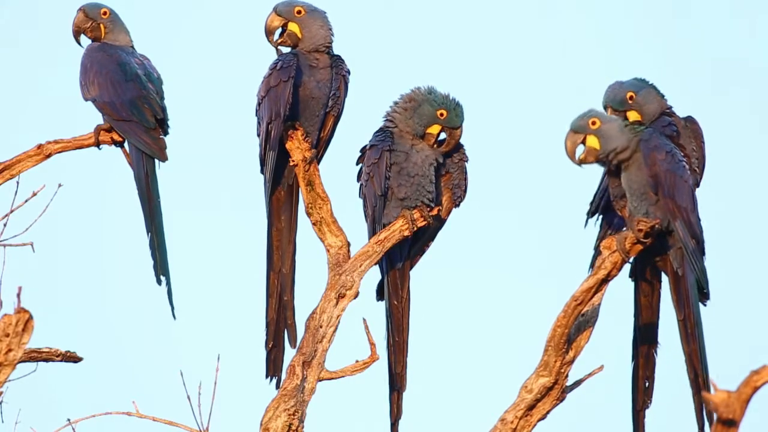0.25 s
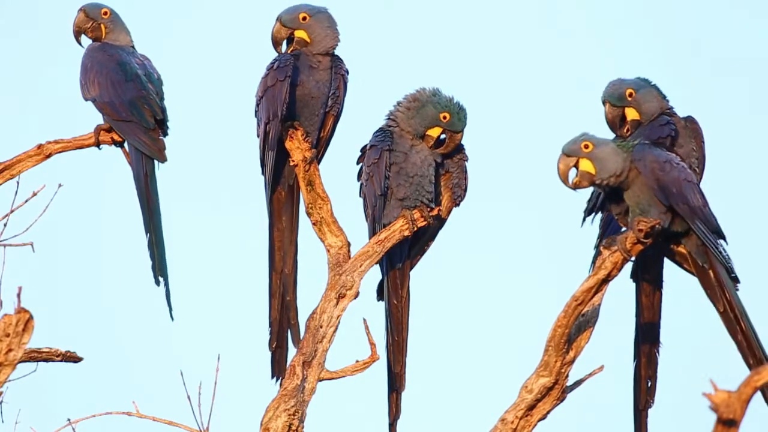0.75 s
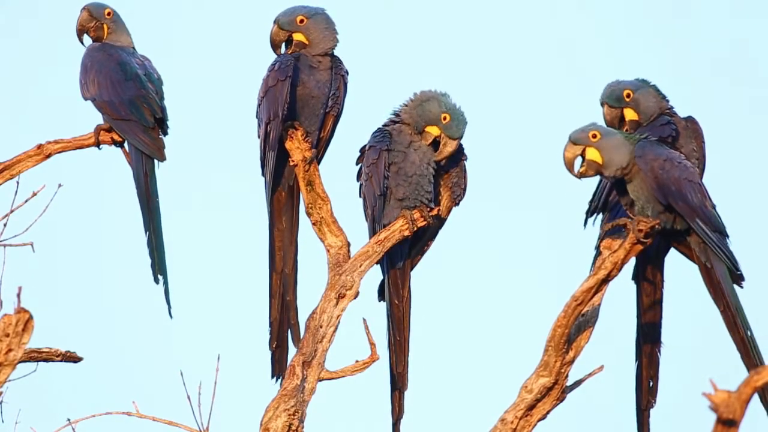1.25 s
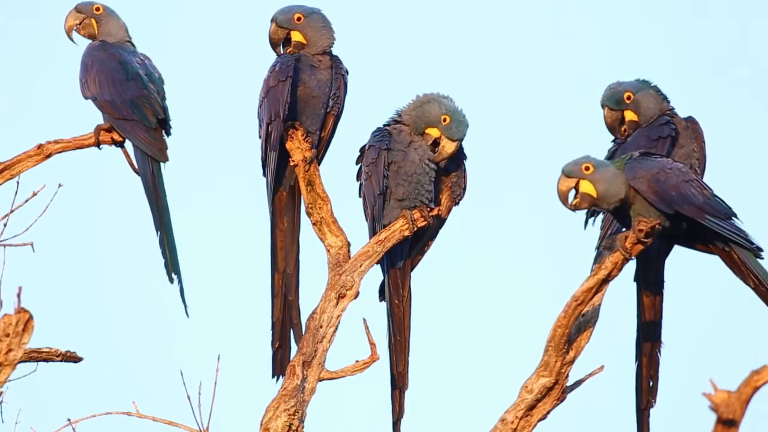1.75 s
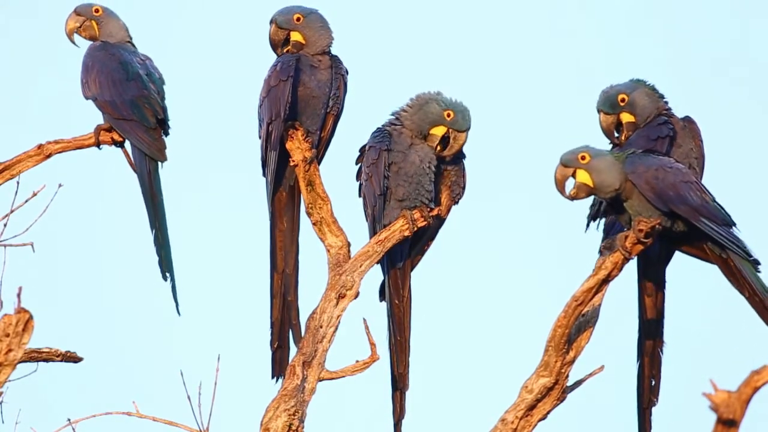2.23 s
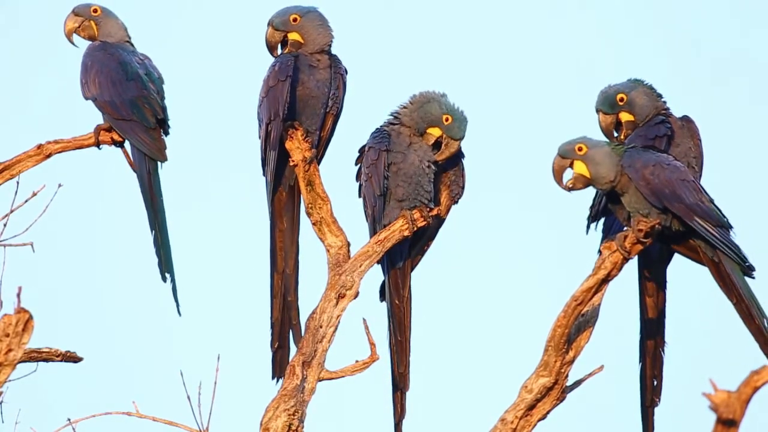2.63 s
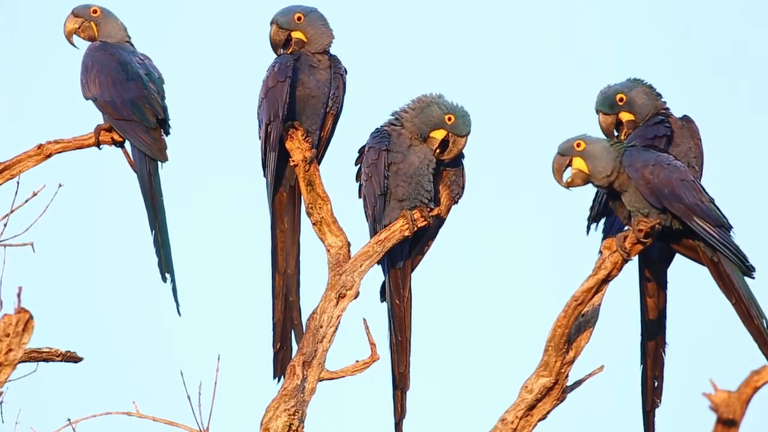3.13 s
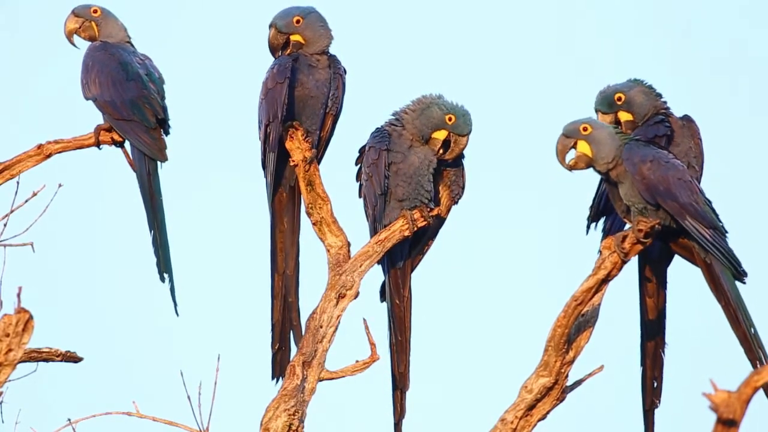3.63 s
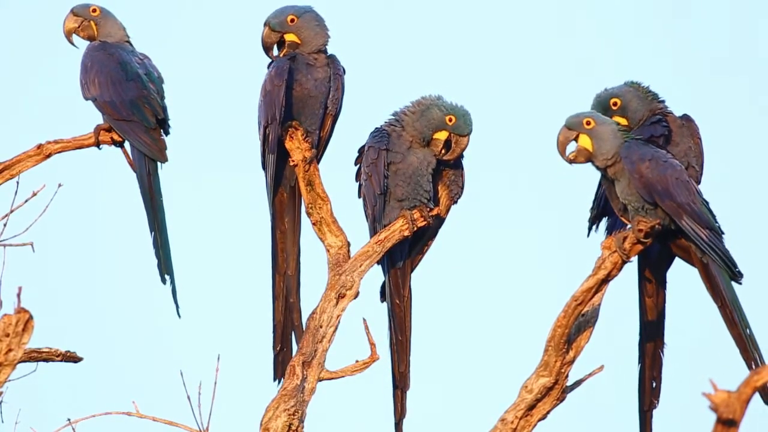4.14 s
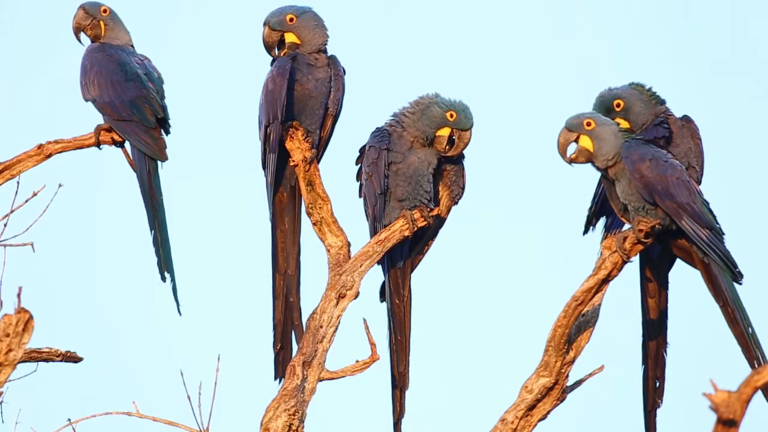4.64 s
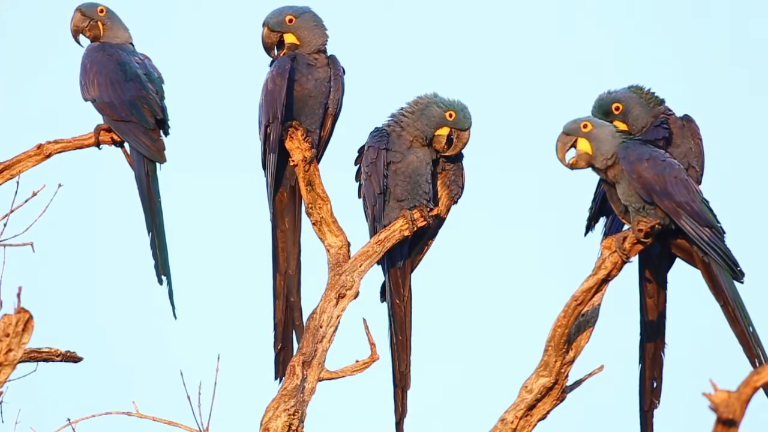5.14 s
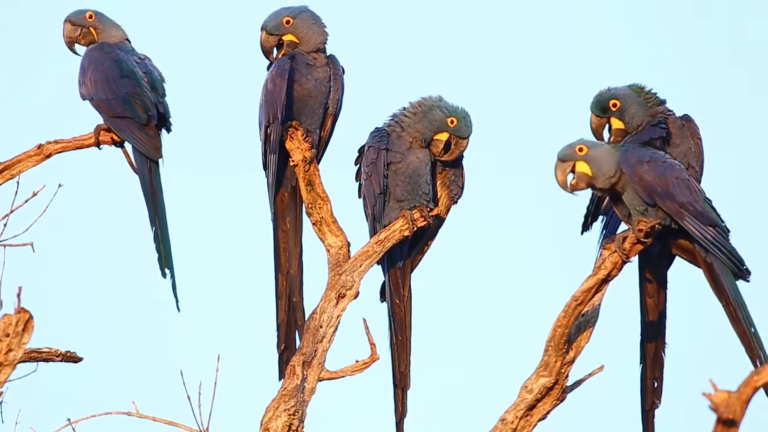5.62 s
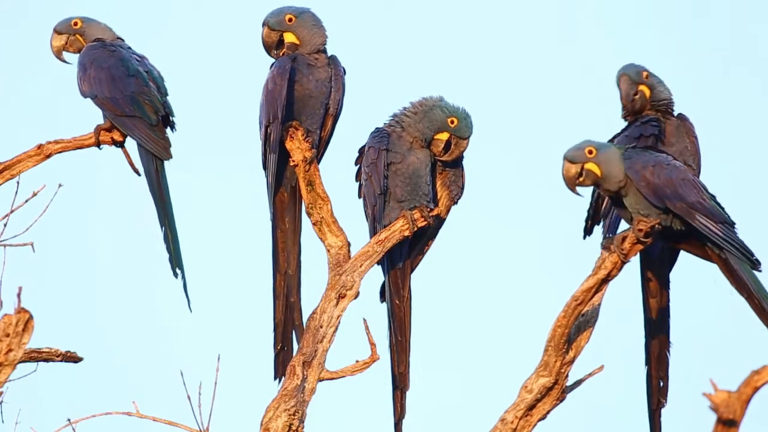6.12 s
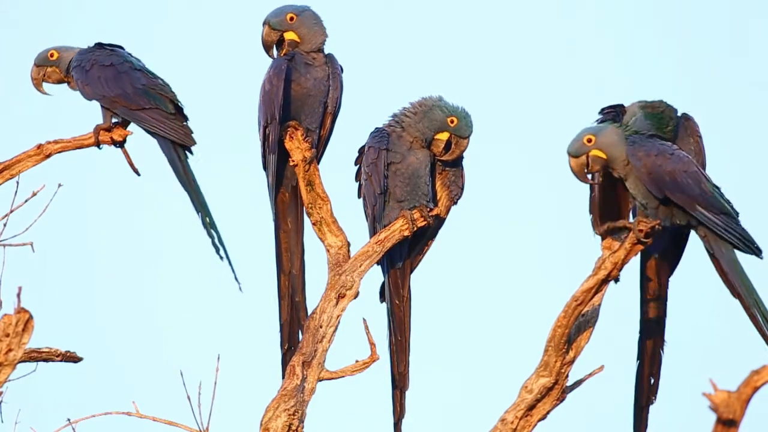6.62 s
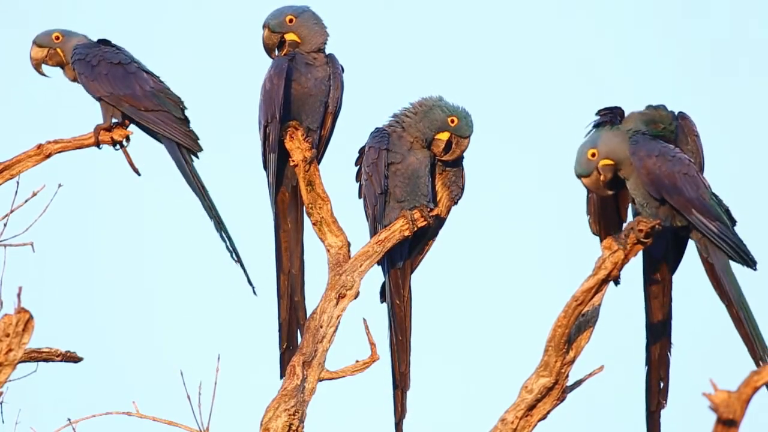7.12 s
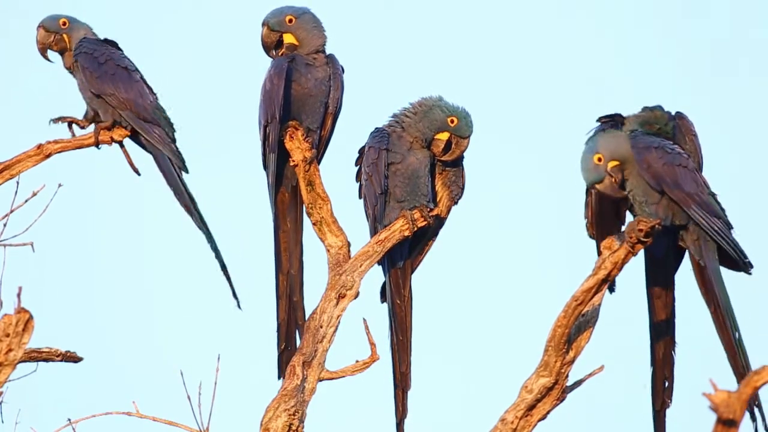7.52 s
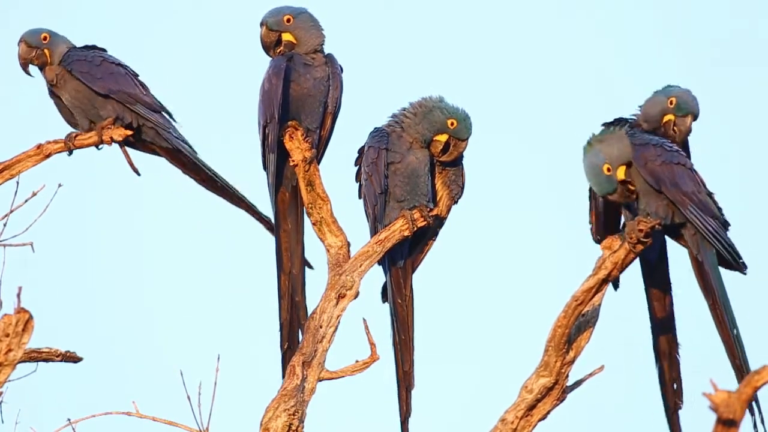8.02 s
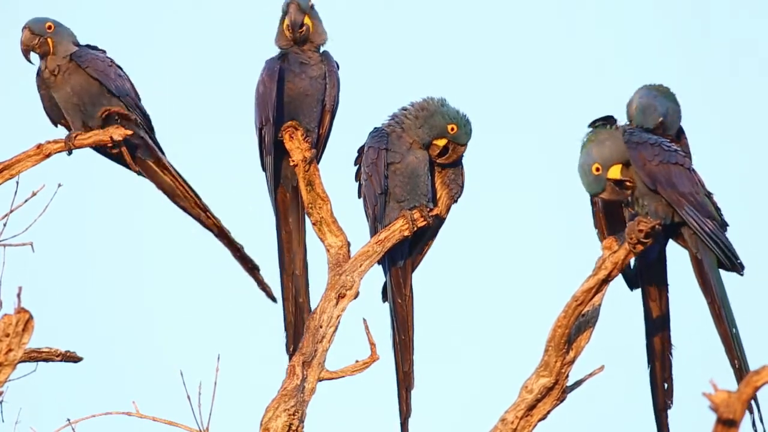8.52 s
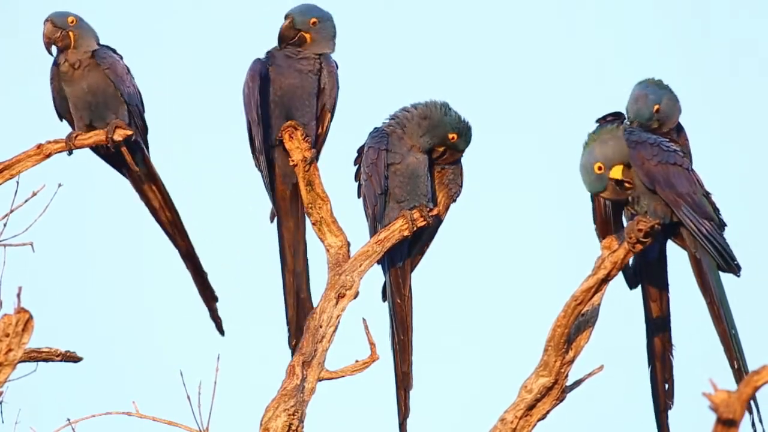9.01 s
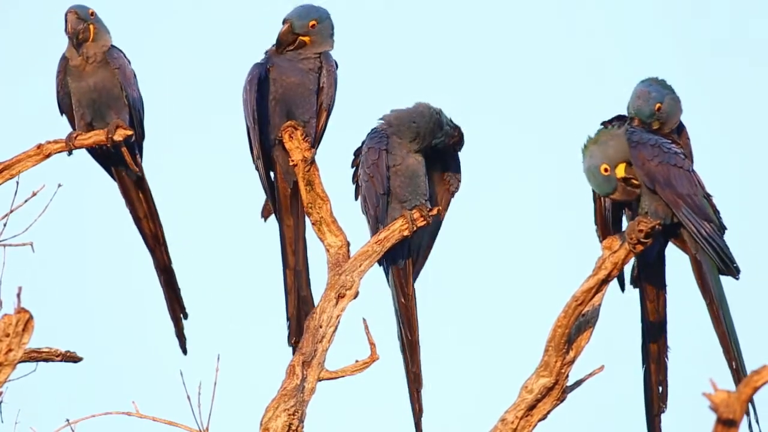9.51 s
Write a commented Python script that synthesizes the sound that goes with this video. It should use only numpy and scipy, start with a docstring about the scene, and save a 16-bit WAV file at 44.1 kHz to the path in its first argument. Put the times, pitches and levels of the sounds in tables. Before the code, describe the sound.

A small flock of large parrots calls outdoors with throaty grunts, sharp falling yelps, wails and one loud rattling squawk, over faint insects and chirping small birds.

```python
"""Macaws call from a dead tree in open woodland: arched cries, clean or rasping, throaty grunts, soft mutters,
runs of squeaks and one loud rattling squawk. Cries are harmonics swept through a tuned throat resonance;
grunts and squawks are uneven pulses ringing a set of resonances; squeaks and small birds are gliding tones.
Small birds chip and trill further off, insects shrill as throbbing tones, and flock and air are shaped noise.
Decaying noise echoes throw the calls back from the trees, onto one microphone channel."""
import sys
import numpy as np
from scipy import signal
from scipy.fft import rfft, irfft
from scipy.io import wavfile

SR = 44100
rng = np.random.default_rng(int(sys.argv[2]) if len(sys.argv) > 2 else 0)


def pcm_store(signal):
    """Save signal as 16-bit PCM."""
    levels = np.round(np.clip(np.atleast_2d(signal), -1, 1) * 32767)
    wavfile.write(sys.argv[1], SR, levels.astype(np.int16).T)


N = 430416
TIME = np.arange(N) / SR   # s

# Levels are relative: layer trims and woodland echoes come on top.
# Still air and far insects: f/Hz, relative density/dB
AIR_SPECTRUM = [(20, -5.5), (55, 1.5), (110, -6.5), (220, -9), (500, 1), (900, -2.5), (1800, -4.5),
                (3800, -13.5), (4500, -1), (5400, -7), (5900, 0.5), (6400, -20), (10000, -18.5),
                (15500, -21)]
AIR_DB = -54
# The rest of the flock, blurred by distance: t/s, level/dB
FLOCK_LEVEL = [(0, -42.5), (.16, -54.5), (.38, -46.5), (1.0, -51.5), (1.2, -53), (2.5, -62), (2.9, -54.5),
               (4.2, -47), (5.2, -62.5), (7.4, -58), (7.8, -50.5), (9.76, -48)]
# Colour of the distant flock: f/Hz, relative level/dB
FLOCK_SPECTRUM = [(250, -40), (500, -60), (900, -7), (1600, -3), (2400, 0.5), (3300, 1.5), (3900, -5),
                  (4600, -15), (7000, -15.5), (12000, -47)]

# Clearest low mutters: t/s, level/dB, f/Hz
MUTTER_NOTES = [(0.623, -43.5, 537), (1.336, -48.5, 483), (1.422, -46.5, 471), (2.353, -48.5, 472),
                (2.696, -51, 639), (5.603, -53.5, 463), (3.102, -44.5, 515.6), (4.222, -46.5, 533),
                (9.043, -50, 494)]
# Clearest chips of the small birds: t/s, level/dB, f/Hz
CHIP_NOTES = [(0.135, -49.5, 6150), (0.434, -48.5, 6880), (0.802, -47.5, 7050), (1.411, -48.5, 7350),
              (3.343, -47, 6630), (4.352, -47, 7250), (6.9, -51, 7350), (7.135, -46.5, 6140),
              (9.39, -48.5, 7500)]
# Spells of fainter chipping: start t/s, end t/s
FAINT_CHIP_SPELLS = [(.3, 1.2), (7.3, 7.65)]

# Grunts: t/s, level/dB, beak opening as treble tilt/dB per octave
GRUNT_NOTES = [(0.177, -28, 1), (1.335, -28.5, 16), (1.42, -33.5, 14), (1.683, -27.5, 3.5),
               (2.361, -29.5, 12), (2.461, -23, 3.5), (2.984, -25, 4), (3.105, -32.5, 3.5),
               (3.325, -34.5, 5), (3.477, -21, 8), (4.046, -22, 5.5), (4.478, -25, 3), (5.043, -24.5, 2),
               (5.426, -26, 2.5), (5.75, -32.5, 5), (5.777, -23.5, 5), (6.314, -24.5, 1.5),
               (7.085, -25.5, 3), (7.523, -25, 2), (8.413, -26.5, 4), (9.138, -27, 1.5), (9.395, -32, 4)]
# Throat with the beak nearly shut, before that tilt: f/Hz, width/Hz, level/dB
GRUNT_RESONANCES = [(358, 180, -20), (600, 560, -10), (1100, 310, -4), (1560, 190, -2.5), (2037, 163, 2.5),
                    (2530, 960, -6.5), (2920, 1600, -14)]
GRUNT_S = 0.042
THROAT_SPREAD = 0.033   # share by which the throat's resonances shift from note to note

# Colour of the cries apart from the tuned throat resonance: f/Hz, level/dB
CRY_COLOUR = [(700, 10), (1100, 4), (1600, 6.5), (2400, 5), (3700, 8.5), (4700, -1), (5500, -3.5),
              (6600, -3.5), (8100, -7.5), (10000, -8.5), (14000, -44)]
# Yelps leap to their top and slide down: top t/s, fall t/s, top f/Hz, level/dB, overtone lift/dB
YELP_CALLS = [(0.236, 0.085, 1823, -29, -11), (.584, 0.065, 1740, -31, -12), (1.268, .045, 1625, -36, 0),
              (2.195, 0.081, 1704, -33, 1), (2.267, 0.07, 1972, -24, 2.5), (3.179, 0.066, 1798, -44, 0),
              (3.447, 0.088, 1897, -31, -9), (4.152, .05, 1718, -31.5, -15), (4.546, 0.076, 1823, -34, 4),
              (7.58, .135, 1653, -42.5, -21), (8.055, .085, 1862, -29.5, -14), (8.58, 0.093, 2040, -44, -1),
              (8.928, 0.04, 1750, -34, -1), (9.177, 0.055, 1710, -33.5, -4), (9.51, 0.063, 1660, -37, -6)]
# Rasps, high forced cries: start t/s, length t/s, top f/Hz, end pitch/share of top, level/dB,
# roughness/factor, overtone lift/dB
RASP_CALLS = [(.35, 0.073, 2177, 0.7, -41, 0.88, -3), (.888, 0.19, 1433, 0.82, -45, 0.7, -21),
              (1.749, .1, 1610, 0.68, -38, 0.4, -1), (1.913, 0.14, 1908, .74, -34, 0.6, 4),
              (1.926, .135, 2573, .7, -38, 0.44, 4), (3.074, .16, 1805, .97, -33, .42, -4),
              (3.828, 0.14, 1887, 0.96, -41.5, 1.11, -1), (4.166, 0.11, 1982, 0.87, -40.5, 1.1, -3),
              (7.673, 0.16, 1841, 0.83, -33, 0.41, -3), (7.87, 0.17, 2070, 0.77, -50, .5, 0),
              (8.146, .19, 2326, 0.74, -44.5, 0.82, -13), (8.6, .125, 1850, .88, -36, 0.66, -7),
              (8.682, 0.13, 2006, 0.9, -41, 0.92, -5), (9.532, 0.11, 1950, 0.67, -48.5, 0.6, 17)]
# Wails, long arches on the second harmonic: start t/s, length t/s, top f/Hz, end pitch/share of top,
# level/dB, overtone lift/dB
WAIL_CALLS = [(.417, .2, 1375, 0.82, -34, -19), (.888, 0.2, 1310, 0.9, -50, -5),
              (1.75, 0.084, 1612, 0.48, -38, -14), (1.79, 0.13, 1267, 0.97, -36, -22),
              (2.33, 0.24, 1280, 0.88, -41, -8), (2.39, 0.28, 1651, 0.72, -33, 1),
              (3.63, .35, 1537, 0.64, -34.5, -18), (4.075, 0.22, 991, 0.76, -43.5, -4),
              (4.677, .283, 1440, .8, -42, -4), (6.232, 0.3, 1173, 0.65, -42, -14.5),
              (8.229, 0.27, 1393, 0.69, -35.5, -21), (8.475, .3, 1071, .85, -51.5, -13.5),
              (9.085, 0.28, 1442, 0.9, -43.5, 1), (9.675, 0.25, 1578, .88, -39, -13)]
# Whines, even arches on the third harmonic: start t/s, length t/s, top f/Hz, end pitch/share of top,
# level/dB, overtone lift/dB
WHINE_CALLS = [(.743, .257, 1058, .85, -43.5, -11), (1.53, .18, 1233, .67, -40.5, -3),
               (6.055, .155, 1226, .66, -41, -3), (4.302, .33, 1156, .9, -43.5, -26),
               (9.33, .34, 1160, .83, -43.5, -13)]
OVERTONE_PATCHY_DB = 3

# The lower insect buzzes at a steady pace
BUZZ_FIRST_S, BUZZ_EVERY_S, BUZZ_S = 0.23, 1.47, 0.58
# Long bouts of the higher insect: start t/s, length t/s
SHRILL_BOUTS = [(1.3, 1.94), (4.25, 1.45), (6.7, 0.33), (8.8, 1)]

# A tiny bird's trill climbs to a held pitch and drops away again
TRILL_START_S, TRILL_END_S, TRILL_RAMP_S = 0.745, 1.57, 0.083
TRILL_HZ, TRILL_CLIMB, TRILL_DB = 10680, 0.14, -59   # climb is a share of the pitch

# A distant bird's rattle: t/s, level/dB
RATTLE_LEVEL = [(1.68, -50.5), (1.95, -43.5), (2.26, -49.5)]
# Throat of the rattling bird: f/Hz, width/Hz, level/dB
RATTLE_RESONANCES = [(385, 79, -9.5), (636, 97, -7.5), (1100, 374, -7.5), (1595, 71, 4.5), (2200, 840, -9)]
# Beak and claw ticks: t/s, level before the decay/dB
TICK_TIMES = [(2.897, -52), (3.123, -43.5), (3.335, -43), (5.976, -48), (7.304, -49.5), (7.917, -43),
              (9.641, -44), (9.694, -46.5)]
# Runs of short falling squeaks: start t/s, length t/s, level/dB, f/Hz
SQUEAK_SERIES = [(4.237, .02, -46, 887), (7.793, .1, -44.5, 1016), (9.003, .1, -42.5, 1246),
                 (9.3, .1, -42, 1100)]
SQUEAK_GAP_S = 0.037   # from one start to the next

# Throat of the squawking bird: f/Hz, width/Hz, level/dB
SQUAWK_RESONANCES = [(610, 140, -4.5), (1000, 170, 1), (1310, 146, 9), (1756, 250, 12), (2370, 110, -17),
                     (2670, 260, -18), (3310, 400, 3), (3646, 305, 4.5), (4680, 370, -14),
                     (6700, 1640, -54), (9900, 540, -18)]
# The squawk swells syllable by syllable until the last one gives out
SQUAWK_START_S, SYLLABLE_S, SQUAWK_DB = 6.585, 0.0445, -29.5
QUICKEN_S = 0.0008   # times the syllable number squared: the beats draw closer together
SWELL_DB_PER_SYLLABLE, LAST_SYLLABLE_DROP_DB = 0.8, 7
SYLLABLE_SHARE = 0.89   # the voice sounds for this share of SYLLABLE_S

CUTOFF_HZ = 15750


def from_db(db):
    """Decibels to gain."""
    return 10 ** (np.asarray(db) / 20)


def rms_one(x):
    """Scale to unit rms."""
    return x / np.sqrt(np.mean(x ** 2) + 1e-20)


def level_curve(rows):
    """Levels joined by straight lines, at every sample."""
    seconds, level_db = np.transpose(rows)
    return np.interp(TIME, seconds, level_db)


def gain_at(spectrum, hz):
    """Gain of a spectrum, read on a log-frequency axis."""
    points, db = np.transpose(spectrum)
    return from_db(np.interp(np.log(hz + 1), np.log(points), db))


def add(out, s, sound):
    """Mix a sound in at time s."""
    i = max(0, int(s * SR))
    out[i:i + len(sound)] += sound[:max(0, N - i)]


def band(x, low_hz, high_hz):
    """Second-order band-pass."""
    edges = [low_hz, min(high_hz, SR / 2 - 1)]
    return signal.sosfilt(signal.butter(2, edges, "band", fs=SR, output="sos"), x)


def wander(size, per_s):
    """Random values, so many a second, joined by lines."""
    steps = np.arange(size) * per_s / SR
    knots = rng.standard_normal(int(steps[-1]) + 2)
    return np.interp(steps, np.arange(len(knots)), knots)


def swell(size, attack, release):
    """Smooth envelope; attack and release are shares of its length."""
    u = np.linspace(0, 1, size)
    ramp = np.clip(np.minimum(u / attack, (1 - u) / release), 0, 1)
    return np.sin(np.pi / 2 * ramp) ** 2


def phase_of(hz):
    """Running phase of a moving pitch."""
    return 2 * np.pi * np.cumsum(hz) / SR


def coloured_noise(spectrum):
    """Steady noise of a given spectrum; rms 1."""
    hz = np.arange(N // 2 + 1) * SR / N
    return rms_one(irfft(rfft(rng.standard_normal(N)) * gain_at(spectrum, hz), N))


def air():
    """Still air and far insects blend into steady shaped noise."""
    return from_db(AIR_DB) * coloured_noise(AIR_SPECTRUM)


def far_flock():
    """Distant voices blur into shaped noise that rises, falls and wavers."""
    level_db = level_curve(FLOCK_LEVEL) + 2 * wander(N, 13)
    return from_db(level_db) * coloured_noise(FLOCK_SPECTRUM)


def woodland(x, near_db, near_t60, far_db, far_t60, far_low_hz, far_high_hz):
    """Scatter from nearby branches, then a longer, narrower wash from the tree line."""
    t = TIME[:2 * SR]
    near = band(rng.standard_normal(len(t)), 350, 7800)
    near = near * from_db(-60 * t / near_t60) * (t > 0.003)
    far = band(rng.standard_normal(len(t)), far_low_hz, far_high_hz)
    far = far * from_db(-60 * t / far_t60) * (1 - np.exp(-t / 0.044))   # builds up gradually
    near_echo = from_db(near_db) * near / np.sqrt(np.sum(near ** 2))
    far_echo = from_db(far_db) * far / np.sqrt(np.sum(far ** 2))
    return x + signal.fftconvolve(x, near_echo + far_echo)[:N]


def small_notes(rows, length_s, glide, arch, jitter, overtone_db, count):
    """Brief gliding, arched notes with a few weakening harmonics."""
    out, u = np.zeros(N), np.linspace(-1, 1, int(length_s * SR))
    for s, level_db, hz in rows:
        phase = phase_of(hz * (1 + glide * u - arch * u * u + jitter * wander(len(u), 509)))
        note = sum(from_db(overtone_db * k) * np.sin((k + 1) * phase) for k in range(count))
        add(out, s, from_db(level_db) * note * swell(len(u), attack=0.18, release=0.18))
    return out


def stray_notes(start, end, count, level_db, hz, spread):
    """Faint notes at loose intervals, scattered around one pitch: t/s, level/dB, f/Hz."""
    notes = []
    for k, (when, high) in enumerate(rng.random((count, 2))):
        s = start + (end - start) * (k + when) / count
        notes.append((s, level_db, hz * (1 + spread * (2 * high - 1))))
    return notes


def mutters():
    """Low, soft voices: short notes that wobble roughly, with nearly equal harmonics."""
    notes = MUTTER_NOTES + stray_notes(0, N / SR, count=9, level_db=-50, hz=544, spread=0.178)
    return from_db(-0.5) * small_notes(notes, length_s=0.038, glide=0.048, arch=0.057, jitter=0.1,
                                       overtone_db=-1, count=4)


def chips():
    """Small birds' very short, high and nearly pure notes."""
    notes = list(CHIP_NOTES)
    for start, end in FAINT_CHIP_SPELLS:
        notes += stray_notes(start, end, count=5, level_db=-51, hz=7050, spread=0.065)
    return from_db(1.0) * small_notes(notes, length_s=0.019, glide=0.0065, arch=0.025, jitter=0.016,
                                      overtone_db=-19, count=2)


def syrinx_pulses(size, pulse_hz, jitter, hiss):
    """The syrinx slaps shut unevenly, with some air noise added."""
    cycles = np.cumsum(pulse_hz * np.exp(jitter * wander(size, pulse_hz))) / SR
    closures = np.diff(np.floor(cycles), prepend=-1)
    slaps = closures * from_db(2.6 * rng.standard_normal(size))
    return rms_one(slaps) + hiss * rng.standard_normal(size)


def resonate(x, modes):
    """Parallel resonances with alternating signs; rms 1."""
    out = 0
    for k, (hz, width, db) in enumerate(modes):
        r = np.exp(-np.pi * width / SR)
        poles = [1, -2 * r * np.cos(2 * np.pi * hz / SR), r * r]
        ringing = (1 - r * r) / 2 * signal.lfilter([1, 0, -1], poles, x)
        out = out + (-1) ** k * from_db(db) * ringing
    return rms_one(out)


def harsh_notes(rows, length_s, modes, pulse_hz, jitter, hiss, attack, release, low_hz, high_hz):
    """Bursts of uneven pulses through the throat; an open beak favours the upper resonances."""
    out, size = np.zeros(N), int(length_s * SR)
    for s, level_db, open_db in rows:
        stretch = 1 + THROAT_SPREAD * rng.standard_normal()
        throat = [(hz * stretch, width, db + open_db * np.log2(hz / 1700)) for hz, width, db in modes]
        voice = resonate(syrinx_pulses(size, pulse_hz, jitter, hiss), throat)
        note = band(voice, low_hz, high_hz) * swell(size, attack, release)
        add(out, s, from_db(level_db) * rms_one(note))
    return out


def grunts():
    """Short bursts of throat pulses, the beak open by a different amount each time."""
    return from_db(-11.5) * harsh_notes(GRUNT_NOTES, GRUNT_S, GRUNT_RESONANCES, pulse_hz=516.0, jitter=0.2,
                                        hiss=0.25, attack=0.33, release=0.45, low_hz=340, high_hz=3010)


def arch(rise_s, fall_s, start_share, end_share, bend):
    """Time from the top of a cry, and its pitch as a share of the top pitch."""
    t = np.arange(-rise_s, fall_s, 1 / SR)
    rising = 1 - (1 - start_share) * (t / rise_s) ** 2
    falling = 1 - (1 - end_share) * np.abs(t / fall_s) ** bend
    return t, np.where(t < 0, rising, falling)


def cry(shape, top_hz, level_db, rough, lift_db, tuning, build, fade_db=0, let_go=1.4):
    """The throat is tuned to a multiple of the top pitch; whichever harmonic crosses it carries the call."""
    t, share = shape
    size = len(t)
    # a forced voice turns chaotic: the pitch scatters and the flow breaks into pulses
    scatter = 0.07385 * rough * wander(size, 900) + 0.0038 * wander(size, 93.7)
    phase = phase_of(top_hz * share * (1 + scatter))
    beating = 7.5 * np.sin(phase_of(172 * np.exp(0.11 * wander(size, 84))))
    flutter = from_db(rough * (beating + 3.2 * wander(size, 598.9)))
    # the throat resonance partly follows the pitch
    centre = tuning * top_hz * share ** 0.77
    voice = 0
    for k in range(1, 9):
        hz = k * top_hz * share
        resonance = 1 + from_db(15) / (1 + (np.log(hz / centre) / 0.15) ** 2)
        # overtones may fade as the pitch sinks, and each comes and goes by itself
        overtone_db = lift_db - fade_db * (1 - share) + OVERTONE_PATCHY_DB * wander(size, 20.4)
        lift = from_db(overtone_db * np.clip(np.log2(hz / centre) * 2, 0, 1))
        strength = gain_at(CRY_COLOUR, hz) * resonance * lift
        voice = voice + strength * np.sin(k * phase) * from_db(2 * wander(size, 66.8))
    # pressure raises loudness together with pitch; it builds late and lets go slowly
    effort = share ** np.where(t < 0, build, let_go) * swell(size, attack=0.056, release=0.084)
    return from_db(level_db) * rms_one(voice * flutter * effort)


def yelps(rise_s=0.025, hold_per_db=0.07, ordinary_db=-33):
    """A quick leap up, then a slide through most of an octave."""
    out = np.zeros(N)
    for top_s, fall_s, hz, level_db, lift_db in YELP_CALLS:
        # above the ordinary level, the louder the yelp, the longer it holds its top
        bend = 0.84 + hold_per_db * max(0, level_db - ordinary_db)
        shape = arch(rise_s, fall_s, start_share=0.66, end_share=0.57, bend=bend)
        call = cry(shape, hz, level_db, rough=0.1, lift_db=lift_db, tuning=1.913, build=4.5,
                   fade_db=37, let_go=2.46)
        add(out, top_s - rise_s, call)
    return out


def rasps(rise_share=0.49):
    """Shallow arches, forced until the voice breaks up."""
    out = np.zeros(N)
    for s, length, hz, end_share, level_db, rough, lift_db in RASP_CALLS:
        rise_s, fall_s = rise_share * length, (1 - rise_share) * length
        shape = arch(rise_s, fall_s, start_share=0.85, end_share=end_share, bend=2.6)
        add(out, s, cry(shape, hz, level_db, rough, lift_db, tuning=1.86, build=4.7))
    return out


def long_cries(rows, rise_share, start_share, bend, rough, tuning):
    """Slow, nearly clean arches."""
    out = np.zeros(N)
    for s, length, hz, end_share, level_db, lift_db in rows:
        rise_s, fall_s = rise_share * length, (1 - rise_share) * length
        shape = arch(rise_s, fall_s, start_share, end_share, bend)
        add(out, s, cry(shape, hz, level_db, rough, lift_db, tuning, build=2.9))
    return out


def wails():
    """Long cries with the throat tuned a little above the second harmonic."""
    return long_cries(WAIL_CALLS, rise_share=0.34, start_share=0.78, bend=2.3, rough=0.031, tuning=2.254)


def whines():
    """Even arches with the throat tuned a little below the third harmonic."""
    return long_cries(WHINE_CALLS, rise_share=0.49, start_share=0.73, bend=1.7, rough=0.026, tuning=2.73)


def insect(bouts, level_db, hz, strokes_hz, depth_db, spread):
    """A shrill wing tone that throbs with each stroke and swells in and out with each bout."""
    singing = np.zeros(N)
    for s, length in bouts:
        add(singing, s, swell(int(length * SR), attack=0.071, release=0.1))
    strokes = from_db(depth_db * np.sin(phase_of(strokes_hz * (1 + 0.022 * wander(N, 5)))))
    tone = np.sin(phase_of(hz * (1 + spread * wander(N, 400))))
    return from_db(level_db) * singing * rms_one(strokes * tone)


def insects():
    """A lower insect in evenly paced buzzes, a higher one in long bouts, each a throbbing wing tone."""
    buzz_bouts = [(s, BUZZ_S) for s in np.arange(BUZZ_FIRST_S, N / SR, BUZZ_EVERY_S)]
    buzz = insect(buzz_bouts, level_db=-58.5, hz=4560, strokes_hz=29.4, depth_db=5, spread=0.017)
    shrill = insect(SHRILL_BOUTS, level_db=-58.5, hz=4830, strokes_hz=51.84, depth_db=4.5, spread=0.00877)
    return buzz + shrill


def trill(notes_hz=29, dip=0.16):
    """Quick arched notes, loudest at their tops."""
    to_edge_s = np.minimum(TIME - TRILL_START_S, TRILL_END_S - TIME)
    held = np.clip(to_edge_s / TRILL_RAMP_S, 0, 1)
    away = np.sin(np.pi * notes_hz * TIME) ** 4   # 0 at the top of a note, 1 between notes
    climb = 1 - TRILL_CLIMB * (1 - held)
    pitch = TRILL_HZ * climb * (1 - dip * away + 0.0134 * wander(N, 900))
    return (held > 0) * from_db(TRILL_DB - 10 * away) * np.sin(phase_of(pitch))


def far_rattle(syllable_hz=22, depth_db=4):
    """A distant squawk of throat pulses, its syllables half run together."""
    start, end = RATTLE_LEVEL[0][0], RATTLE_LEVEL[-1][0]
    gate = np.interp(TIME, [start, start + 0.037, end - 0.05, end], [0, 1, 1, 0])
    pulses = syrinx_pulses(N, pulse_hz=263.8, jitter=0.35, hiss=0.72)
    voice = band(resonate(pulses, RATTLE_RESONANCES), 340, 3700)
    syllable_db = depth_db * np.sin(2 * np.pi * syllable_hz * TIME)
    return gate * from_db(level_curve(RATTLE_LEVEL) + 2.0 + syllable_db) * voice


def ticks(decay_s=0.011):
    """Dry little snaps of beaks and claws: noise bursts that die at once."""
    out, t = np.zeros(N), TIME[:SR // 20]
    for s, level_db in TICK_TIMES:
        snap = rms_one(band(rng.standard_normal(len(t)), 2700, 9400))
        add(out, s, from_db(level_db) * snap * np.exp(-t / decay_s))
    return from_db(-2.0) * out


def squeaks(spread=0.084):
    """Strings of evenly spaced notes that fall steeply, each run scattered around one pitch."""
    notes = []
    for start, length, level_db, hz in SQUEAK_SERIES:
        for s in np.arange(start, start + length, SQUEAK_GAP_S):
            notes.append((s, level_db, hz * (1 + spread * rng.standard_normal())))
    return small_notes(notes, length_s=0.0257, glide=-0.23, arch=0.026, jitter=0.09,
                       overtone_db=-22, count=3)


def squawk(count=7):
    """A quickening run of pulsed throat syllables, swelling until the last gives out."""
    k = np.arange(count)
    starts = SQUAWK_START_S + SYLLABLE_S * k - QUICKEN_S * k * k
    level_db = SQUAWK_DB + SWELL_DB_PER_SYLLABLE * k - LAST_SYLLABLE_DROP_DB * (k == count - 1)
    syllables = zip(starts, level_db, np.zeros(count))   # no beak tilt
    voice = harsh_notes(syllables, SYLLABLE_S * SYLLABLE_SHARE, SQUAWK_RESONANCES, pulse_hz=578, jitter=0.17,
                        hiss=0.18, attack=0.12, release=0.35, low_hz=300, high_hz=10000)
    voice = signal.sosfilt(signal.butter(8, 10500, fs=SR, output="sos"), voice)
    # the open beak leaves a hollow in the treble
    return signal.sosfilt(signal.butter(1, [6000, 8600], "bandstop", fs=SR, output="sos"), voice)


def scene():
    """Macaws in front; small birds, the rest of the flock, insects and air behind."""
    cries = yelps() + rasps() + wails() + whines()
    criers = from_db(-2.02) * woodland(cries, near_db=-11, near_t60=0.4, far_db=-16.5, far_t60=0.63,
                                       far_low_hz=2710, far_high_hz=4870)
    near_birds = mutters() + grunts() + ticks() + squeaks() + squawk()
    perched = woodland(near_birds, near_db=-12, near_t60=0.13, far_db=-22.5, far_t60=1.0,
                       far_low_hz=1000, far_high_hz=2600)
    far_birds = chips() + trill() + far_rattle()
    distant = woodland(far_birds, near_db=-4, near_t60=0.4, far_db=-44.0, far_t60=0.8,
                       far_low_hz=700, far_high_hz=4970)
    return (criers + perched + distant + far_flock() + insects() + air())[None]


def record(dry):
    """The top is cut steeply; the converter sits slightly off zero."""
    offset = -0.0062   # of full scale
    return signal.sosfilt(signal.ellip(10, 0.1, 70, CUTOFF_HZ, fs=SR, output="sos"), dry) + offset


dry = scene()
out = record(dry)
pcm_store(out)
```